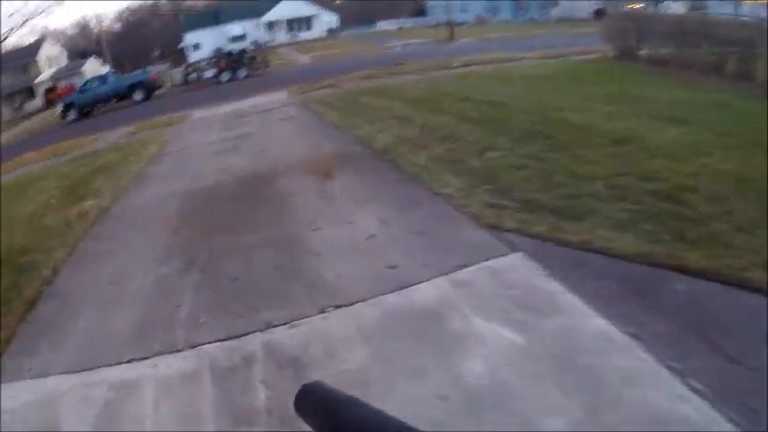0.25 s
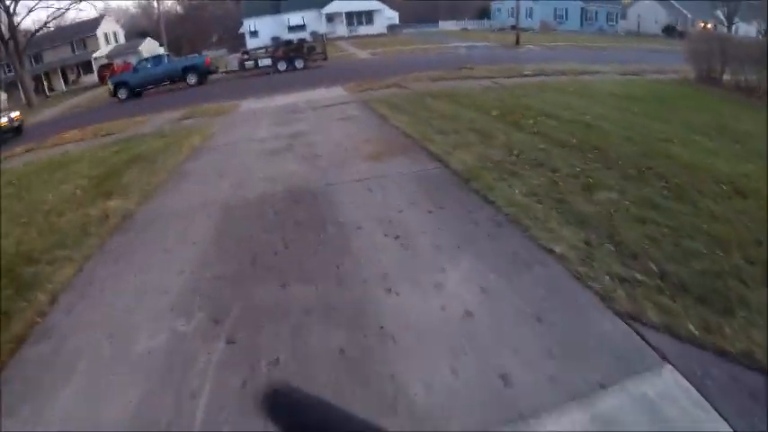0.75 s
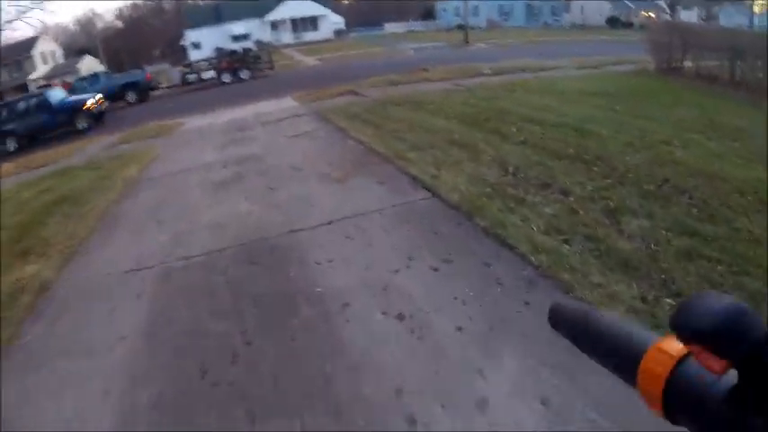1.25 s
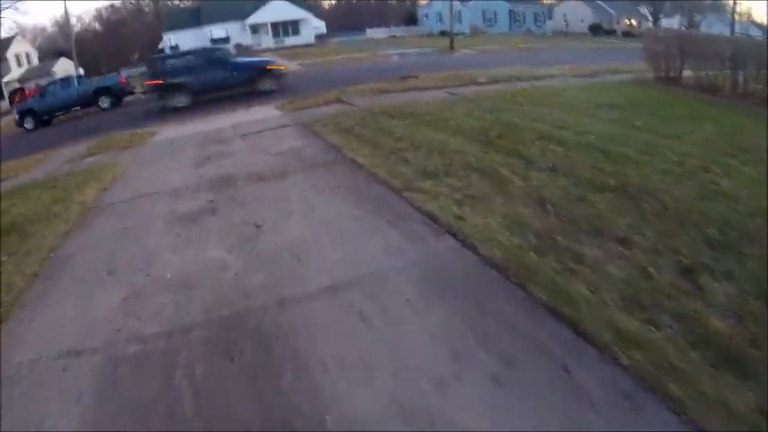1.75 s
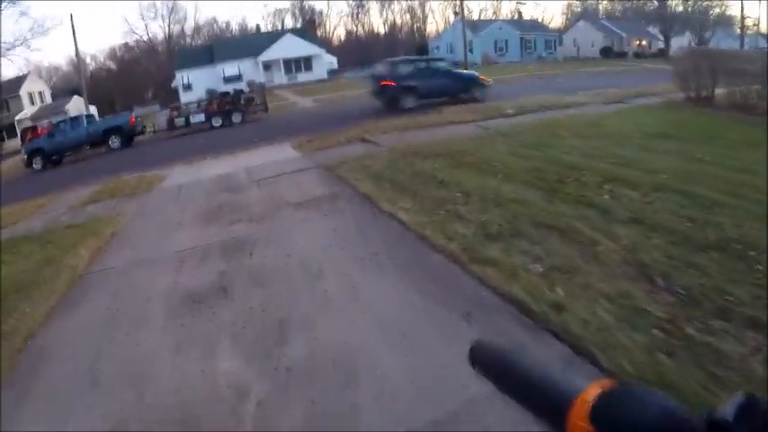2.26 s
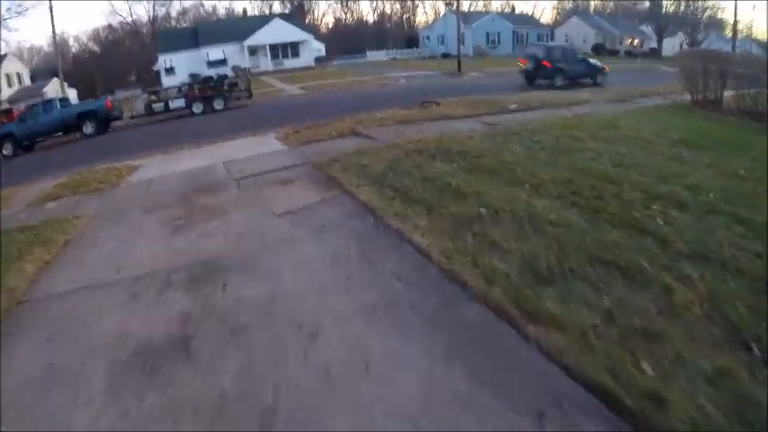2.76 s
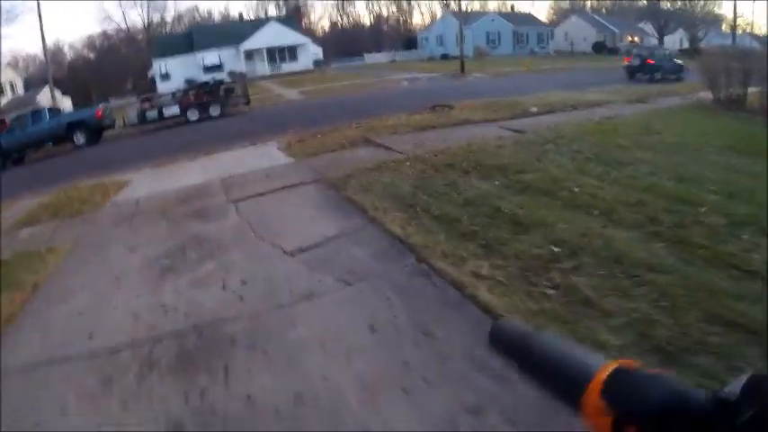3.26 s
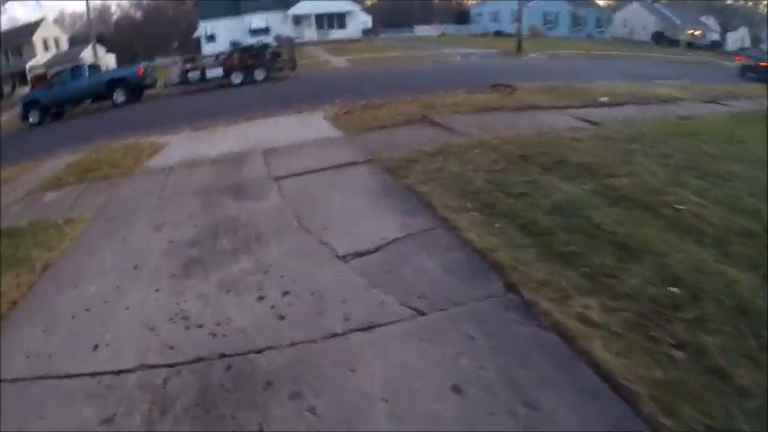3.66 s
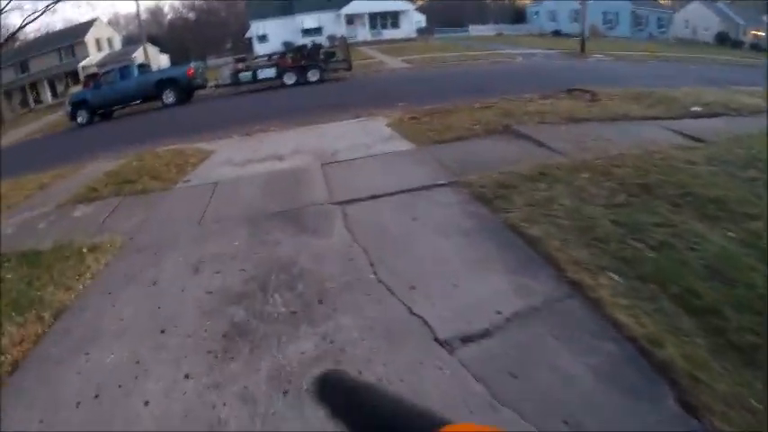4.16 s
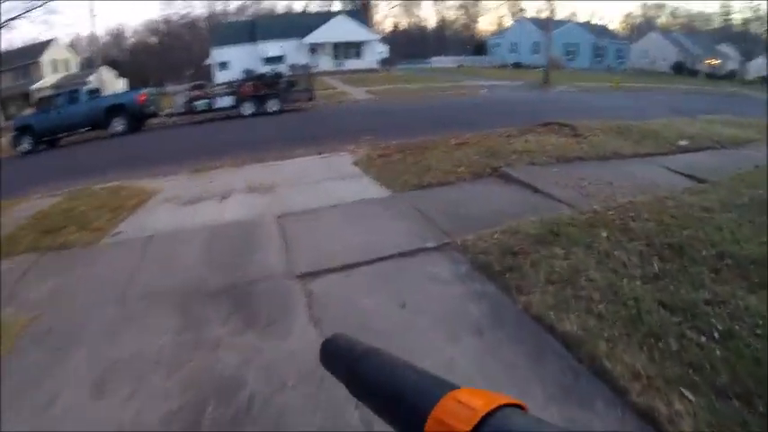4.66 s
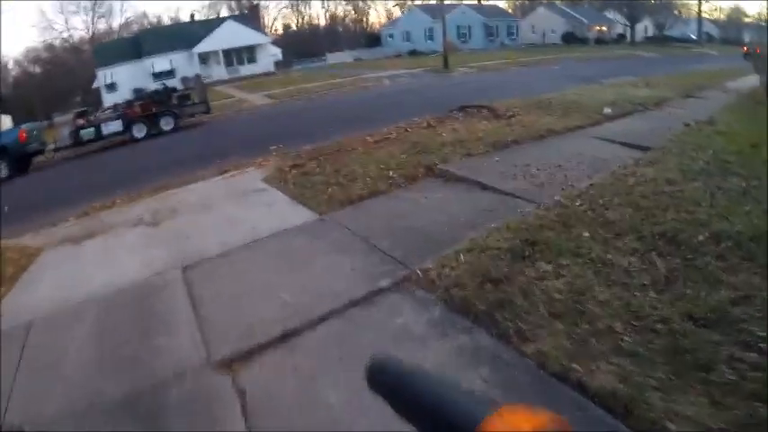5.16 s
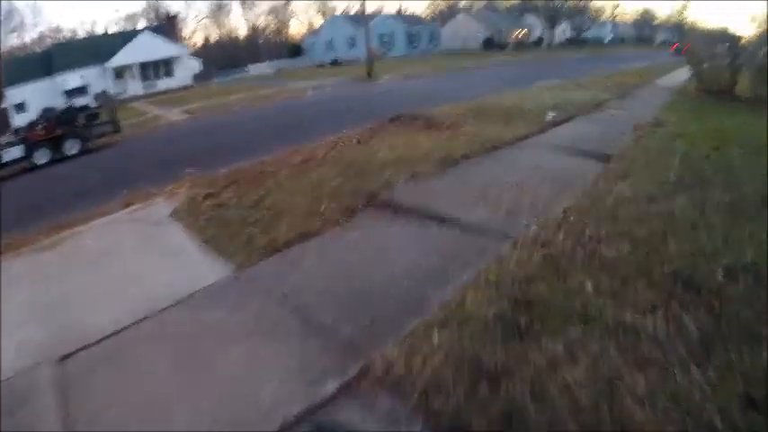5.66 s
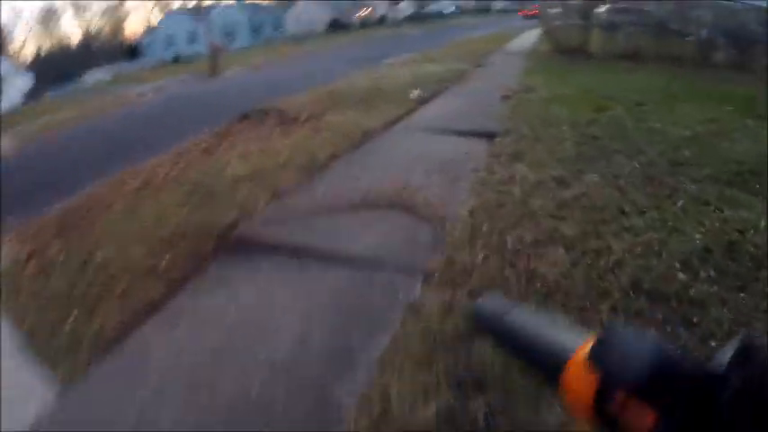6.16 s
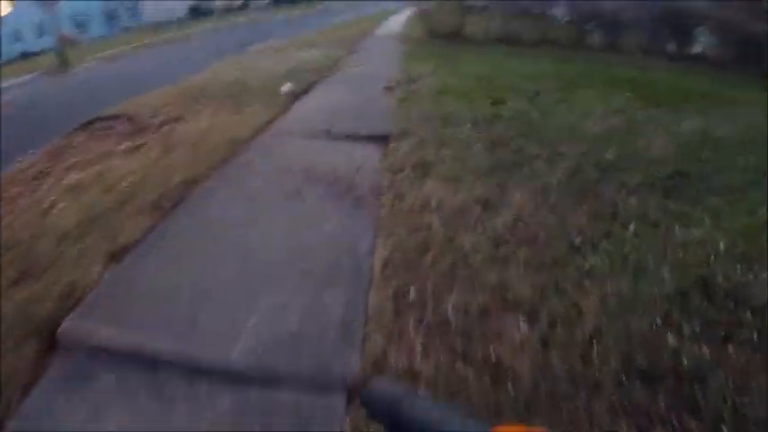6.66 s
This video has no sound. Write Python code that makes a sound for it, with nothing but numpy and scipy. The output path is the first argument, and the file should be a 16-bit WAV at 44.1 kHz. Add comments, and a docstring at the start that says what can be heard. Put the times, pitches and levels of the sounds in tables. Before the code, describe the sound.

Outdoors, carried beside the microphone, a small petrol engine holds a dense steady drone, throbbing gently about twice a second. Broad air noise washes over concrete with sandy ticks and faint whistling from the tube. Late on, the drone drops in pitch and softens for about half a second, sputtering, then strains upward with a rough growl and settles back at full throttle, the hiss gusting stronger.

```python
"""On a concrete drive, close by, a petrol leaf blower is carried along at full throttle.
Just after five seconds the trigger is let go: the engine runs down, catches and climbs back.
A torque balance turns one shaft; exhaust pulses on it excite fixed muffler resonances and the fan sings.
Shaped noise makes the air jet, with an echo off the concrete, and sparse impulses make the swept grit."""
import sys
import numpy as np
from scipy import signal
from scipy.fft import rfft, irfft
from scipy.io import wavfile
from scipy.ndimage import uniform_filter1d

SR = 44100
rng = np.random.default_rng(int(sys.argv[2]) if len(sys.argv) > 2 else 0)


def store_wav(level_fs):
    """Save 16-bit WAV to argv[1]."""
    pcm = np.round(np.clip(np.atleast_2d(level_fs), -1, 1) * 32767)
    wavfile.write(sys.argv[1], SR, pcm.T.astype(np.int16))


N = 304290
TIME = np.arange(N) / SR
BINS = np.fft.rfftfreq(N, 1 / SR)


def gain_of(db):
    """Level definition: decibels to an amplitude ratio."""
    return 10 ** (np.asarray(db) / 20)


def evened(x):
    """Normalisation: scales a signal to rms 1."""
    return x / np.sqrt(np.mean(x ** 2) + 1e-20)


def played(rows):
    """Linear interpolation: each column of a curve table at every sample."""
    s, *columns = np.transpose(rows)
    return [np.interp(TIME, s, c) for c in columns]


def read(points, hz):
    """Spectral envelope: levels interpolated along a logarithmic frequency axis."""
    f, value = np.transpose(points)
    return np.interp(np.log(hz + 1), np.log(f + 1), value)


def coloured(x, points):
    """Linear filtering: weights the spectrum of x by an envelope, then scales to rms 1."""
    spectrum = rfft(x) * gain_of(read(points, BINS))
    return evened(irfft(spectrum, N))


def wander(rate_hz):
    """Low-pass random process: noise under a Gaussian roll-off (1/e at rate_hz), rms 1."""
    spectrum = rfft(rng.standard_normal(N)) * np.exp(-(BINS / rate_hz) ** 2)
    return evened(irfft(spectrum, N))


def fuzzy_tone(tone_hz, width_hz):
    """Narrow-band noise: a resonance blown by turbulence, as two randomly modulated quadratures."""
    angle = 2 * np.pi * tone_hz * TIME
    return wander(width_hz) * np.cos(angle) + wander(width_hz) * np.sin(angle)


def swelling(rows):
    """Superposition: Gaussian humps (middle, span, heights) summed for each column of heights."""
    rows = np.array(rows)
    middle, span = rows[:, :1], rows[:, 1:2]
    humps = np.exp(-np.pi * ((TIME - middle) / (span * .7)) ** 2)  # equivalent width 0.7 span
    return rows[:, 2:].T @ humps


def causal(db):
    """Minimum phase: log gain with the phase of a path that rings only after it is struck."""
    log_gain = np.log(gain_of(db))
    mirrored = np.r_[log_gain, log_gain[-2:0:-1]]
    return np.conj(signal.hilbert(mirrored))[:len(db)]


# the machine shifts on the back as it is carried:
# [t/s, exhaust level/dB, crankshaft hum level/dB, fan tone level/dB, fan roar level/dB]
POSE = [(0, 0.3, 0.3, 4, 0), (1.3, 0.14, 0.4, 1.5, -0.9), (3, -0.23, -1, -2.5, -1), (5.1, -0.1, .7, 6.5, 0),
        (5.85, -1.5, 0, -4, -1), (6.25, 1.4, -1, 0, 2), (6.5, 1.3, -2.5, -3, 2), (6.72, 0.7, 2.3, -3, -0.5),
        (6.9, -0.8, 1, 2, 3)]


def carried_pose():
    """Directivity: level changes of exhaust, crankshaft hum, fan tone and fan roar, in dB."""
    return played(POSE)


# the trigger is let go once and squeezed again: [t/s, opening/0-1]
THROTTLE = [(5.102, 1), (5.183, 0), (5.429, 0), (5.58, .407), (5.74, 1)]
# firing rate at top speed, drifting a little: [t/s, f/Hz]
TOP_SPEED = [(0, 60.6), (.8, 60.72), (1.2, 60.65), (1.38, 60.35), (1.8, 60.85), (2.75, 60.8), (3.15, 61.12),
             (3.48, 60.55), (3.95, 60.92), (4.35, 60.4), (4.78, 60.4), (5.1, 60.72), (6.9, 60.78)]
# how fast the shaft answers (1/s), and the share of torque lost towards standstill
SPIN_PER_S, TORQUE_SAG = 2.49, .354
# the engine fires hard from this opening, fully a span further on, and a moment late
BITE_FROM, BITE_SPAN, BITE_LAG_S = 0.26, 0.35, 0.035
STRAIN_SPAN = 0.14  # share below top speed at which strain is full


def shaft():
    """Torque balance against drag that grows as speed squared: firing rate, speed, load and strain."""
    throttle = played(THROTTLE)[0]
    step = 44  # samples per integration step
    speeds = [1.]
    for opening in throttle[step::step].tolist():
        now = speeds[-1]
        torque = opening * (1 - TORQUE_SAG * (1 - now))
        drag = now ** 2
        speeds.append(now + SPIN_PER_S * step / SR * (torque - drag))
    speed = np.interp(TIME, TIME[::step], speeds)  # 1 is top speed
    late_throttle = np.interp(TIME - BITE_LAG_S, TIME, throttle)
    load = np.clip((late_throttle - BITE_FROM) / BITE_SPAN, 0, 1)
    strain = load * np.clip((1 - speed) / STRAIN_SPAN, 0, 1)
    hz = speed * played(TOP_SPEED)[0]
    return hz, speed, load, strain


# the air noise swells and ebbs as the nozzle swings:
# [middle t/s, span t/s, jet level/dB, hiss-on-the-pavement level/dB]
SWELLS = [(.39, 0.075, 2.5, 2.5), (.68, .16, 2, 0), (1.04, 0.28, -0.5, 2.5), (1.35, 0.39, 5, 2.5),
          (2.26, .25, 1.5, 0), (2.65, .35, -1.3, -1), (3.08, .12, -1.3, -1), (3.8, .5, -1.2, -1.5),
          (4.3, .5, 0.5, 1.5), (4.84, 0.43, 3, 1), (5.21, 0.23, 4, 3), (5.76, .2, .5, 1),
          (5.96, 0.071, 5.5, 3), (6.1, .11, 4.5, 3), (6.31, 0.38, 4, 3.5), (6.62, 0.53, 2.5, 5)]
# level at top speed, rise under strain, slope per tenfold speed (all dB)
JET_DB, JET_STRAIN_DB, JET_SLOPE_DB = -35.5, 1.5, 23
HISS_DB, HISS_STRAIN_DB, HISS_SLOPE_DB = -46.5, 1.5, 32


def airflow(speed, strain):
    """Power law of flow noise: jet and hiss levels in dB follow speed, strain and nozzle swing."""
    jet_swell, hiss_swell = swelling(SWELLS)
    decades = np.log10(speed)
    jet_db = JET_DB + JET_STRAIN_DB * strain + JET_SLOPE_DB * decades + jet_swell
    hiss_db = HISS_DB + HISS_STRAIN_DB * strain + HISS_SLOPE_DB * decades + hiss_swell
    return jet_db, hiss_db


# relative spectra of the fan's roar, the jet and the hiss: each [f/Hz, level/dB]
ROAR = [(15, -23.5), (40, -9), (100, -3.5), (210, 0), (310, -5.5), (390, 2), (470, -7), (560, 1.5),
        (650, -4), (780, -4), (920, -7.5), (1100, -15.5), (1500, -25), (3000, -77.5)]
JET = [(620, -23), (1050, -3), (1260, -8.5), (1430, -5), (1530, -9), (1700, -5), (1850, -8.5), (2370, -9),
       (2870, -12), (3430, -19.5), (3800, -18.5), (4940, -38.5), (8360, -120)]
HISS = [(2800, -27.5), (3600, -5), (4250, -5.5), (4800, 0.5), (5030, 0.5), (5280, 2), (5600, -1.5),
        (6150, -6), (6800, -3.5), (8300, -9.5), (10500, -12.5), (11800, -33.5), (13400, -29.5),
        (15000, -31.5)]
# level at top speed, rise under strain, slope per tenfold speed (all dB)
ROAR_DB, ROAR_STRAIN_DB, ROAR_SLOPE_DB = -23, 5.5, 5


def air(turns, speed, strain, jet_db, hiss_db, pulsing=0.23, jet_pulsing=0.05, gust_db=1.0, flicker_db=1.23):
    """Turbulence noise of fan and nozzle: broadband, its flow pulsing a little with every firing."""
    roar_db = ROAR_DB + carried_pose()[3] + ROAR_STRAIN_DB * strain + ROAR_SLOPE_DB * np.log10(speed)
    pulse = np.cos(2 * np.pi * (turns - .75))
    roar = coloured(rng.standard_normal(N), ROAR) * gain_of(roar_db) * (1 + pulsing * pulse)
    jet_gain = gain_of(jet_db + gust_db * wander(27)) * (1 + jet_pulsing * pulse)
    jet = coloured(rng.standard_normal(N), JET) * jet_gain
    hiss = coloured(rng.standard_normal(N), HISS) * gain_of(hiss_db + flicker_db * wander(35))
    return roar + jet + hiss


def pavement(x, delay_s=.004, swing_s=0.000505, echo_db=-12):
    """Image source: concrete returns the air noise, its path changing as the nozzle swings."""
    echo = np.interp(TIME - delay_s - swing_s * wander(1.5), TIME, x)
    echo_gain = gain_of(echo_db)
    return (x + echo_gain * echo) / np.sqrt(1 + echo_gain ** 2)


# relative spectrum of a grain's tick: [f/Hz, level/dB]
GRIT_SPECTRUM = [(1000, -25.5), (3000, 5.0), (7000, 4.5), (10500, -5),
                 (11800, -15), (13500, -12.5), (15000, -19)]


def grit(hiss_db, per_s=90, grit_db=-12, spread_db=3.6):
    """Random impact noise: sand and leaf scraps tick over the concrete where the jet lands."""
    heights_db = spread_db * np.minimum(rng.exponential(1, N), 4)
    sizes = gain_of(heights_db) * rng.choice([-1, 1], N)
    struck = rng.random(N) < per_s / SR
    return coloured(sizes * struck, GRIT_SPECTRUM) * gain_of(hiss_db + grit_db)


# the tube whistles faintly now and then: [middle t/s, span t/s, level over its usual/dB]
WHISTLES = [(.38, 0.26, 13), (1.7, .5, 9.5), (3.87, 0.11, 15), (4.29, 0.38, 14.5), (5.3, .3, 11)]


def whistle(hiss_db, tube_hz=1445, tube_db=-52, edge_hz=5275, edge_db=-13):
    """Flow-excited resonance: the tube whistles low now and then; its rim sings thinly with the hiss."""
    tube = gain_of(tube_db + swelling(WHISTLES)[0]) * fuzzy_tone(tube_hz, width_hz=51)
    rim = gain_of(hiss_db + edge_db) * fuzzy_tone(edge_hz, width_hz=110)
    return tube + rim


def valves(hz, turns, tick_db=-43, tick_hz=1450, at=0.671, length=.04):
    """Impact noise: a short clatter once a cycle, its amplitude growing as speed squared."""
    gate = np.exp(-((turns % 1 - at) / length) ** 2)  # in parts of a cycle
    spectrum = [(tick_hz / 2, -20), (tick_hz, 0), (tick_hz * 2, -18), (12000, -50)]
    tick = coloured(gate * rng.standard_normal(N), spectrum)
    return gain_of(tick_db) * tick * (hz / hz.max()) ** 2


# what the fan housing lets out of the blade tone: [f/Hz, level/dB]
HOUSING = [(380, -1.5), (500, 3), (575, 6), (640, 2.5), (760, -12.5), (950, -5.5), (1120, -5.5),
           (1220, -10), (1450, -10)]
# level at top speed, rise below it, change when coasting (all dB)
FAN_DB, FAN_SLOW_DB, FAN_COAST_DB = -38, 13, -8.5


def fan(hz, turns, speed, uneven, flutter_db=3.5, octave_db=-6, octave_fast_db=-7, rough=1.9, slow_span=0.16):
    """Blade-passing tone, twelve a firing: stands out below top speed, breaks up while coasting down."""
    slowness = np.clip((1 - speed) / slow_span, 0, 1)
    fan_db = FAN_DB + carried_pose()[2] + FAN_SLOW_DB * slowness
    blade_hz = 12 * hz
    acceleration = uniform_filter1d(np.gradient(hz) * SR, size=2000)  # Hz per second
    coasting = np.clip(-acceleration / 40, 0, 1)
    blade = 2 * np.pi * 12 * turns
    blade = blade + (rough * coasting + .5) * np.sqrt(abs(uneven)) * wander(39)
    tone = gain_of(read(HOUSING, blade_hz) + FAN_COAST_DB * coasting) * np.sin(blade)
    octave_level = read(HOUSING, 2 * blade_hz) + octave_db + np.interp(hz, [46, 50], [0, octave_fast_db])
    octave = gain_of(octave_level) * np.sin(2 * blade)
    return np.sqrt(2) * gain_of(fan_db + flutter_db * wander(25)) * (tone + octave)


# near top speed the ninth order sings and throbs at walking pace: level, depth 0-1, rate, time of one dip
THROB_DB, THROB_DEPTH, THROB_PER_S, THROB_DIP_S = -19, 0.39, 2.047, 0.41


def throb(hz, in_tune_hz=58.8, off_tune_hz=57, off_tune_db=-20):
    """Beating of two phasors: amplitude of the ninth order, which is strong only near top speed."""
    beat = abs(1 - THROB_DEPTH * np.exp(2j * np.pi * THROB_PER_S * (TIME - THROB_DIP_S)))
    tuning_db = np.interp(hz, [off_tune_hz, in_tune_hz], [off_tune_db, 0])
    return beat * gain_of(THROB_DB + tuning_db)


# muffler resonances, also heard in the exhaust: [f/Hz, half width f/Hz, lift level/dB before its factor]
MUFFLER = [(408.4, 19, 15), (566.6, 31.1, 18), (674.9, 20.5, 13), (1410, 15, 11)]


def snarl(strain, snarl_db=-24.0, width_hz=15):
    """Resonance under noise excitation: as the engine pulls, ragged gas blows two muffler modes."""
    ringing = sum(fuzzy_tone(f, width_hz) for f, _, _ in MUFFLER[1:3])
    return gain_of(snarl_db) * strain ** 3 * ringing


# spectrum of the exhaust pulse; orders 1, 2 and 9 take only its phase: [f/Hz, level/dB]
PULSE = [(61, -2), (121, 6), (182, 0), (243, -1), (303, -15), (370, -22), (490, -23.5), (620, -21),
         (790, -16), (860, -29), (1200, -44), (1700, -43), (2400, -53), (3000, -47)]
# levels at top speed, changes when coasting or straining, slopes per tenfold speed (all dB)
EXHAUST_DB, EXHAUST_COAST_DB, EXHAUST_SLOPE_DB = -16, -11.5, 43.5
CRANK_DB, CRANK_COAST_DB, CRANK_STRAIN_DB, CRANK_SLOPE_DB = -21.5, 0.5, 7, 23
# factor on the muffler's lift: at top speed, added when coasting, added under strain
LIFT, LIFT_COAST, LIFT_STRAIN = 1.004, -.25, 0.37


def exhaust(hz, turns, speed, load, strain, uneven, jitter=0.0065, putter_db=-7.0, sway_db=0.5,
            step_db=2.2, intake=0.4, intake_lag=.47, count=42):
    """Source-filter principle: harmonics of one pulse a firing slide through fixed muffler resonances."""
    nearer_db, hum_db, _, _ = carried_pose()
    coast, decades = 1 - load, np.log10(speed)
    exhaust_db = EXHAUST_DB + nearer_db + EXHAUST_COAST_DB * coast + EXHAUST_SLOPE_DB * decades
    crank_db = CRANK_DB + hum_db + CRANK_COAST_DB * coast + CRANK_STRAIN_DB * strain
    crank_db = crank_db + CRANK_SLOPE_DB * decades
    lift = LIFT + LIFT_COAST * coast + LIFT_STRAIN * strain
    # weak firings come unevenly in both time and strength
    spin = np.exp(2j * np.pi * (turns + jitter * np.sqrt(abs(uneven)) * wander(18)))
    strength = gain_of(exhaust_db) * (1 + uneven * wander(26))
    # the slow putter swings against the pulse
    own_level = {1: -gain_of(crank_db + putter_db), 2: gain_of(crank_db), 9: throb(hz)}
    grid = np.arange(SR // 2 + 1)  # Hz
    pulse = causal(read(PULSE, grid))
    modes = causal(sum(db / (1 + ((grid - f) / width) ** 2) for f, width, db in MUFFLER))
    # paths change slowly, so they are worked out at every 64th sample
    slow_s, slow_hz, slow_lift = TIME[::64], hz[::64], lift[::64]
    # at low speed the gulp of the intake stands out between the firings
    gulp = intake * np.interp(slow_hz, [42, 50], [1, 0])
    sway_times = np.linspace(0, TIME[-1], 48)
    wave, out = np.ones(N, complex), np.zeros(N)
    for k in range(1, count):
        wave = wave * spin
        order_hz = k * slow_hz
        path = np.exp(np.interp(order_hz, grid, pulse) + slow_lift * np.interp(order_hz, grid, modes))
        if k in own_level:
            path = path / abs(path)
        else:
            # each harmonic sways as the machine is swung about; the higher ones also bob with every step
            bob_db = step_db * np.interp(k, [3, 7], [0, 1])
            bob = gain_of(bob_db * np.cos(2 * np.pi * (THROB_PER_S * slow_s + rng.random())))
            sway_gains = gain_of(sway_db * rng.standard_normal(len(sway_times)))
            sway = np.interp(slow_s, sway_times, sway_gains) * bob
            intake_comb = (1 + gulp * np.exp(-2j * np.pi * k * intake_lag)) / np.sqrt(1 + gulp ** 2)
            path = path * sway * intake_comb
        out += own_level.get(k, strength) * (np.interp(TIME, slow_s, path) * wave).real
    return np.sqrt(2) * out


# unevenness of the firing: at top speed, added when coasting, added under strain
UNEVEN, UNEVEN_COAST, UNEVEN_STRAIN = 0.029, 0.28, -0.026


def scene():
    """Superposition of sources: all parts of the machine turn with one shaft."""
    hz, speed, load, strain = shaft()
    turns = np.cumsum(hz) / SR  # one turn a firing
    uneven = UNEVEN + UNEVEN_COAST * (1 - load) + UNEVEN_STRAIN * strain
    jet_db, hiss_db = airflow(speed, strain)
    blown = pavement(air(turns, speed, strain, jet_db, hiss_db)) + grit(hiss_db) + whistle(hiss_db)
    machine = valves(hz, turns) + fan(hz, turns, speed, uneven) + snarl(strain)
    machine = machine + exhaust(hz, turns, speed, load, strain, uneven)
    return (blown + machine)[None]


EDGE_HZ = 14900  # upper band limit


def record(dry, ceiling=0.8):
    """Saturation and band limiting: the tallest peaks are rounded off, then the top is cut."""
    rounded = dry / (1 + (dry / ceiling) ** 8) ** (1 / 8)
    low_pass = signal.firwin(511, EDGE_HZ, window=("kaiser", 9), fs=SR)
    return signal.oaconvolve(rounded, low_pass[None], "same")


dry = scene()
out = record(dry)
store_wav(out)
```